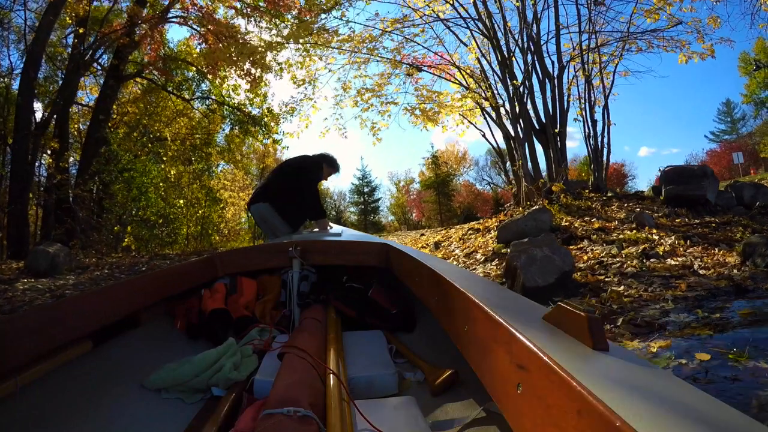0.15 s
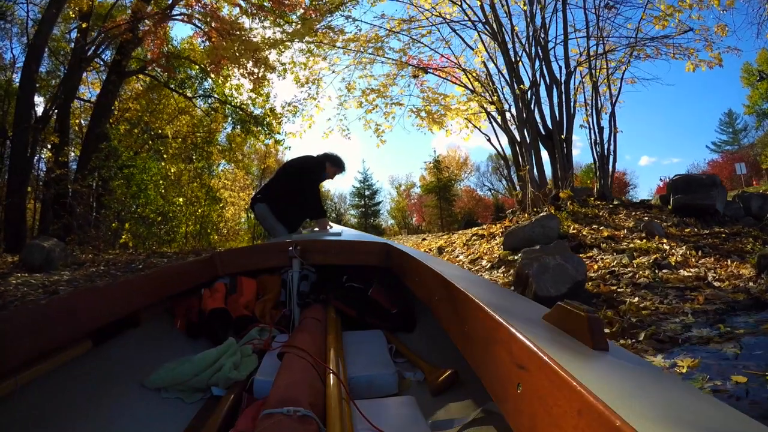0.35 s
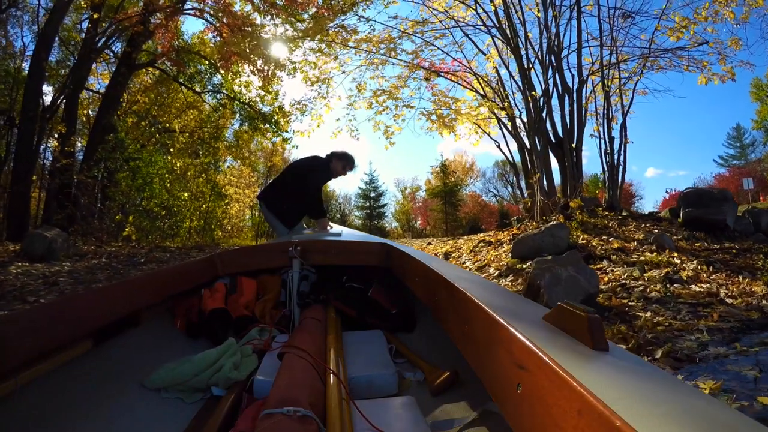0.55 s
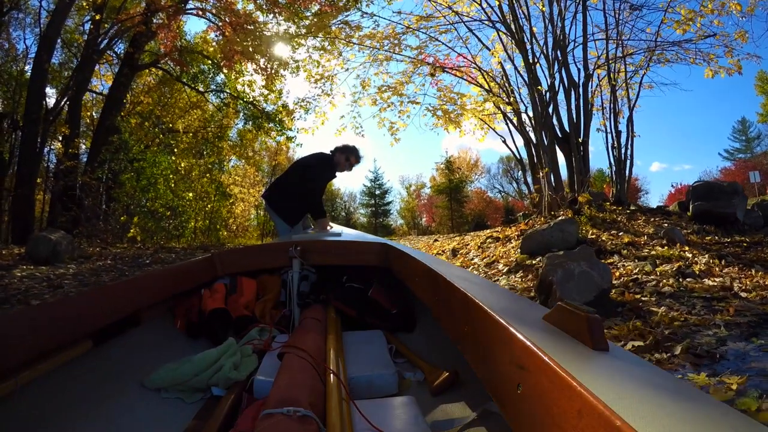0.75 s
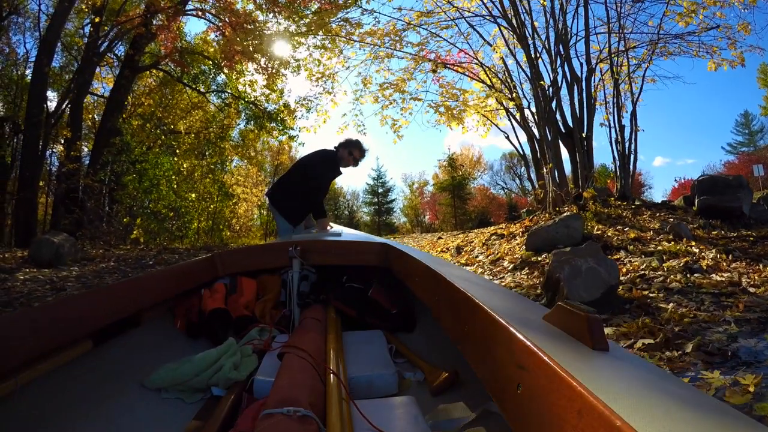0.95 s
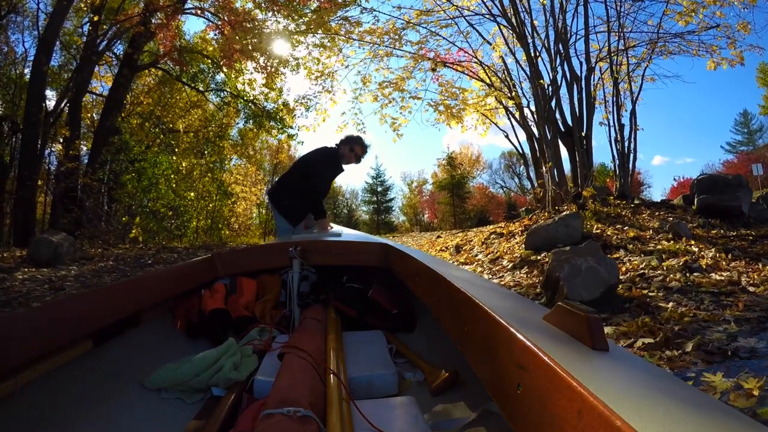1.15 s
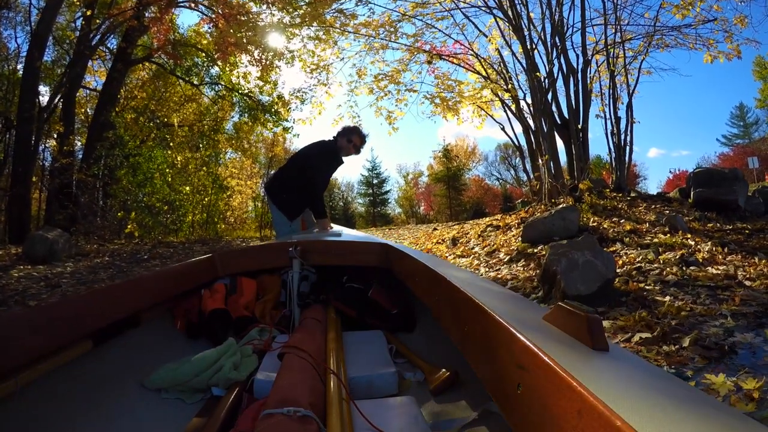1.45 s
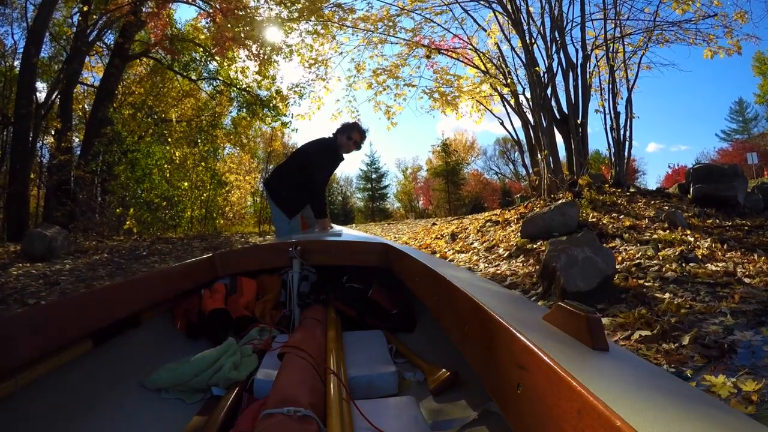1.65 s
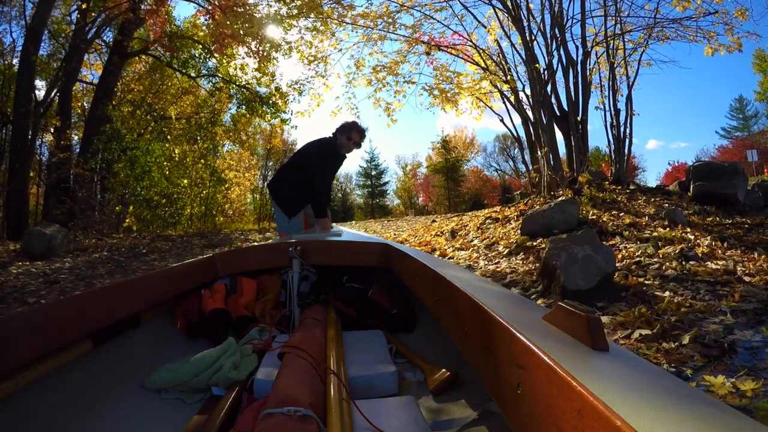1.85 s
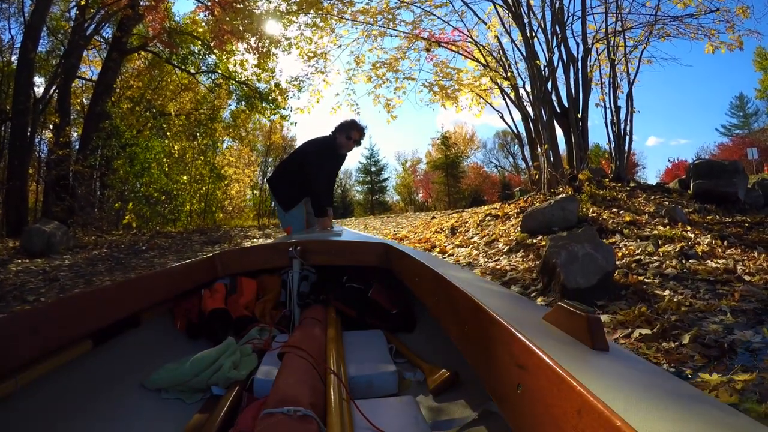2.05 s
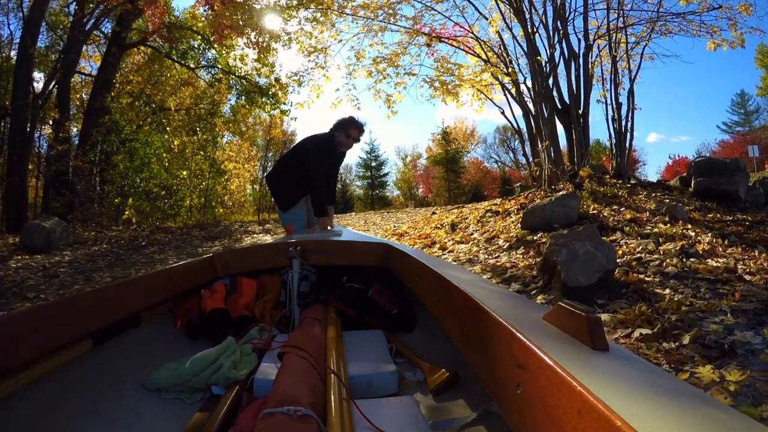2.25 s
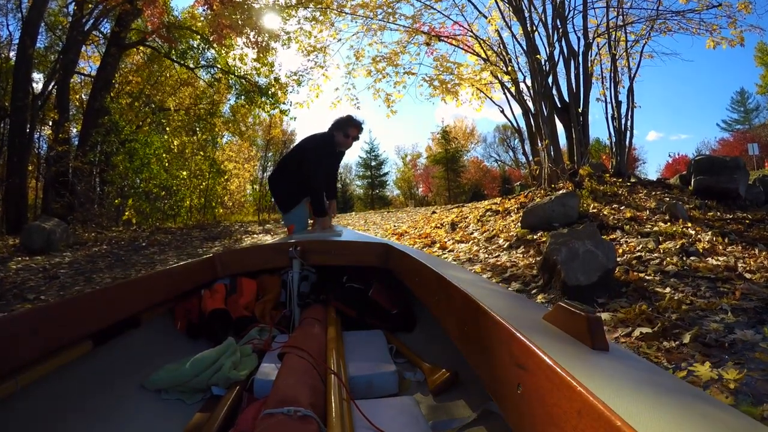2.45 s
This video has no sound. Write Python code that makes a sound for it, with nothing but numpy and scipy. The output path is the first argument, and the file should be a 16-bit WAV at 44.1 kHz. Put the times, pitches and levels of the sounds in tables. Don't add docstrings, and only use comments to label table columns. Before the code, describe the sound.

Close, hull-mounted microphone on a small wooden boat: brief rubbing hiss, loud cracking thump with low boom, scrape over leaves, a tiny squeak, near quiet, then scattered dull knocks, ticks and low bumps outdoors.

```python
import sys
import numpy as np
from scipy import signal
from scipy.io import wavfile
from scipy.ndimage import uniform_filter1d

SR = 44100
rng = np.random.default_rng(int(sys.argv[2]) if len(sys.argv) > 2 else 0)


def dump_mix(stems):
    frames = np.atleast_2d(stems).T
    limited = np.clip(frames, -1, 1)
    pcm = np.round(limited * 32767).astype(np.int16)
    wavfile.write(sys.argv[1], SR, pcm)


def voltage_ratio(decibels):
    exponent = np.asarray(decibels, float) / 20
    return 10 ** exponent


N = 114660
T = np.arange(N) / SR

# pitch_hz, level_db, t60_s
HULL_MODES = [(96.4, -9, 0.43), (134, -23, 1), (144.7, -5.5, 0.14), (194.7, -3, 0.1), (280, -17.5, 0.16),
              (370, -9, 0.064)]
PLANK_HZ = [1036, 1256, 1290, 1506, 1734, 2000, 2474]
PLANK_TRAVEL_MS = 1.475


def unit(x):
    return x / np.sqrt(np.mean(x ** 2))


def band(x, hz, octaves):
    edges = np.clip(hz * 2 ** (np.array([-0.5, 0.5]) * octaves), 10, 0.45 * SR)
    return signal.sosfilt(signal.butter(2, edges, "band", fs=SR, output="sos"), x)


def walk(rate):
    hold = int(SR / rate)
    steps = np.repeat(rng.standard_normal(N // hold + 1), hold)
    return 1.14 * uniform_filter1d(uniform_filter1d(steps, hold), hold)[:N]


def ring(modes, late_ms):
    hz, db, t60 = np.array(modes, float).T[:, :, None]
    arrival_s = late_ms / 1000 * np.sqrt(1000 / hz)
    t = np.maximum(T[:SR // 2] - arrival_s, 0)
    decay = np.exp(-np.log(1000) * t / t60)
    response = (voltage_ratio(db) * np.sin(2 * np.pi * hz * t) * decay).sum(axis=0)
    return unit(response) / np.sqrt(SR // 2)


def grit(spread_db, count=N):
    size = np.minimum(rng.exponential(size=count), 5)
    return unit(rng.standard_normal(count) * voltage_ratio(spread_db * size))


def contacts(rows, rise_ms, fall):
    length = 8192
    out, t_ms = np.zeros(N + length), T[:length] * 1000
    for start_s, db, hz, ms, octaves in rows:
        envelope = np.clip(t_ms / rise_ms, 0, 1) * np.exp(-(t_ms / ms) ** fall)
        burst = band(grit(1.52, count=length) * envelope, hz, octaves)
        first = int(start_s * SR)
        out[first:first + length] += voltage_ratio(db) * burst / np.abs(burst).max()
    return out[:N]


def planking(x):
    chance = rng.standard_normal((67, 2))
    dense_hz = np.geomspace(300, 9000, num=60) * (1 + 0.008 * chance[7:, 0])
    hz = np.r_[dense_hz, PLANK_HZ]
    lift_db = np.r_[np.full(60, 13.5), np.zeros(7)]
    db = chance[:, 1] + 0.34 * np.log2(hz / 1000) + lift_db
    t60 = 0.016 * (1000 / hz) ** 0.5
    modes = np.c_[hz, db, t60]
    response = ring(modes[::2], PLANK_TRAVEL_MS) - ring(modes[1::2], PLANK_TRAVEL_MS)
    return signal.fftconvolve(x, response)[:N] / np.sqrt(2)


def air():
    # pitch_hz, level_db per half octave
    spectrum = [(25, -52.5), (45, -58.5), (90, -52.5), (250, -69), (800, -60.5), (1800, -63.5), (3500, -55),
                (7000, -63.5), (15000, -79)]
    # start_s, level_db
    rustle_rows = [
        (0, -66),
        (.2, -55),
        (.85, -55.5),
        (1.0, -65),
        (1.2, -69),
    ]
    air_hz, air_db = np.array(spectrum).T
    far = 0
    for hz in 25 * 2 ** np.arange(0, 9.6, 0.5):
        flicker_db = min(1, (250 / hz) ** 0.5) * 2 * walk(12)
        level_db = np.interp(np.log(hz), np.log(air_hz), air_db) + flicker_db
        far = far + voltage_ratio(level_db) * unit(band(rng.standard_normal(N), hz, 0.49))
    fine, coarse = grit(1.3), grit(1.3)
    leaves = unit(band(fine, 10970, 0.32)) + voltage_ratio(5.0) * unit(band(coarse, 4540, 3.15))
    rustle_db = np.interp(T, *np.array(rustle_rows).T) + 2.6 * walk(20)
    return unit(far) * voltage_ratio(-46.5) + leaves * voltage_ratio(rustle_db)


def drag():
    # start_s, groan_db, grit_db
    drag_rows = [(0, -47, -46), (.1, -35, -43.5), (.19, -31.5, -42.5), (.26, -21.5, -34), (.36, -28, -40.5),
                 (.55, -35.5, -40.5), (.65, -34.5, -43), (.74, -40, -46), (.82, -26, -42.5),
                 (.92, -41, -50), (1.15, -44, -56.5), (1.3, -51.5, -61), (1.72, -49.5, -57.5),
                 (1.82, -41.5, -54), (2.0, -46.5, -53), (2.25, -56.5, -59.5), (2.402, -36.5, -58),
                 (2.6, -49, -63)]
    start_s, groan_db, grit_db = np.array(drag_rows).T
    damped = [(hz, db / 2, t60 * 0.04) for hz, db, t60 in HULL_MODES]
    slips = grit(3.76) * voltage_ratio(2.2 * walk(29.66))
    groan = unit(signal.fftconvolve(slips, ring(damped, 0.016))[:N])
    rubbing = band(grit(2.0) * voltage_ratio(0.37 * walk(61.8)), 900, 2.98)
    scratch = unit(planking(rubbing))
    groan = band(groan, 174, 3.1) * voltage_ratio(np.interp(T, start_s, groan_db))
    return groan + scratch * voltage_ratio(np.interp(T, start_s, grit_db))


def swish():
    # start_s, level_db, centre_hz
    stroke = [
        (0, -45, 3260),
        (0.029, -39.5, 3400),
        (.08, -35.5, 3700),
        (.12, -30, 4300),
        (.145, -25.5, 5130),
        (.165, -36.5, 5200),
        (.18, -49, 5200),
    ]
    # pitch_hz, width_octaves, lift_db; broad ones, then narrow resonances
    hiss = [(3400, 0.17, -4.0), (2400, 0.98, 1), (4300, 0.36, -4.0), (5200, 0.28, -14.5),
            (6460, 0.6, -6.5), (9200, 0.66, -6), (11500, 0.27, -5),
            (2815, 0.041, -9), (3400, 0.081, -6), (4660, 0.054, -12), (5160, 0.04, -9.5),
            (6340, 0.049, -10), (7400, 0.05, -12)]
    start_s, db, centre_hz = np.array(stroke).T
    out = 0
    for hz, octaves, lift_db in hiss:
        away = np.log2(hz / np.interp(T, start_s, centre_hz))
        level_db = lift_db - 6.8 * away ** 2 + 1.5 * walk(65)
        out = out + unit(band(grit(3.5), hz, octaves)) * voltage_ratio(level_db)
    return out * voltage_ratio(np.interp(T, start_s, db, right=-120) - 8)


def gear():
    # start_s, level_db, pitch_hz, length_ms, width_octaves
    tick_rows = [(.211, -27, 11600, 4.5, 0.25), (.229, -29, 6200, 17.4, 0.46),
                 (.775, -33, 7000, 15.5, 0.49), (1.035, -46, 8950, 19, 0.95), (1.067, -40, 5060, 17, 0.34),
                 (1.08, -45, 11700, 6, 0.21), (1.776, -37, 3800, 9.8, 1), (1.861, -41, 9800, 9.3, 0.89),
                 (1.871, -30, 3520, 9.8, 0.16), (1.911, -31.5, 5200, 16, 0.88),
                 (1.912, -36.5, 10400, 8, 0.86), (2.028, -43, 11500, 5, .7), (2.428, -30, 3500, 12, 0.18)]
    # start_s, level_db, pitch_hz, length_ms, width_octaves
    tap_rows = [(.02, -36, 1800, 6.9, 0.26), (.03, -31, 1650, 7, 0.41), (.213, -23, 1170, 4.3, 0.29),
                (.214, -14.5, 386, 24, 0.55), (.229, -15, 1270, 1.5, 0.44), (.248, -13.5, 1250, 4, 0.55),
                (.258, -32, 1130, 13, 0.54), (.401, -30, 3300, 10, 0.27), (.673, -34.5, 2550, 13, 0.14),
                (.78, -36, 960, 4.4, 0.65), (.484, -35, 2200, 17, 0.33), (.52, -36.5, 3770, 22, 0.11),
                (.535, -39, 2260, 51, 0.11), (.585, -36, 2400, 38, 0.15), (.638, -38.5, 1020, 21, 0.11),
                (.692, -32, 1270, 12, .2), (.774, -36, 2430, 10, 0.18), (.797, -30.5, 1560, 18, 0.12),
                (1.04, -43.5, 850, 8.7, .5), (1.094, -35.5, 595, 8.8, 0.49), (1.107, -38.5, 1330, 17, 0.25),
                (1.112, -42, 610, 8, 0.37), (1.176, -51, 930, 10, 0.33), (2.262, -40, 720, 34, .9),
                (2.422, -33, 1260, 16, 0.74), (2.468, -37, 520, 13, 0.28), (1.605, -28.5, 480, 17.5, 0.59),
                (1.684, -42, 540, 22, 0.65), (1.753, -31.5, 402, 25, 0.26), (2.113, -39.5, 347, 23, 0.46),
                (2.424, -25.5, 375, 13, 0.27), (2.442, -25, 273, 39, 0.62)]
    return contacts(tick_rows, 1.0, 1.2) + contacts(tap_rows, 0.73, 1.0)


def knocks():
    # start_s, level_db, contact_hz, contact_ms, body_db
    knock_rows = [(0.21, -5, 1840, 8.2, -6.5), (.214, -14, 3100, 10.5, -3.5), (0.227, -15, 1180, 6.3, -3.5),
                  (.247, -14, 1150, 14, -8), (0.403, -22.5, 1410, 12, -7.5), (.675, -25.5, 1420, 16, -5.5),
                  (0.78, -27.5, 1290, 9.7, -3.5), (0.804, -26.5, 1510, 12.3, -1.5),
                  (1.748, -29.5, 1060, 35, -5.5), (1.767, -27.5, 1160, 14.7, -4),
                  (1.872, -25, 860, 15, -3.5), (1.937, -29.5, 620, 21, -1.5), (2.011, -40.5, 1310, 6.6, -8),
                  (2.332, -28.5, 1690, 14.7, 0), (2.398, -39.5, 1650, 28, -8), (2.447, -37.5, 1050, 16, -1)]
    # pitch_hz, level_db
    hollow_modes = [(200, 7), (262, 2), (345, 2.5), (415, 3), (540, -6.5), (650, -5), (790, -4)]
    bright_rows = [(s, db, hz, ms, 1.25) for s, db, hz, ms, _ in knock_rows]
    dull_rows = [(s, db + body_db, 439, ms * 1.42, 1.47) for s, db, _, ms, body_db in knock_rows]
    bright = contacts(bright_rows, 1.0, 1.43)
    dull = contacts(dull_rows, 1.2, 0.81)
    plank_ring = ring([(hz, 0, 0.06) for hz in PLANK_HZ], 4.015)
    hollow_ring = ring([(hz, db, 0.03) for hz, db in hollow_modes], PLANK_TRAVEL_MS)
    planks = signal.fftconvolve(bright, plank_ring)[:N]
    hollow = signal.fftconvolve(dull, hollow_ring)[:N]
    return voltage_ratio(1.0) * bright + voltage_ratio(-18) * planks + voltage_ratio(-6.5) * hollow + voltage_ratio(-3.0) * dull


def keel_drop():
    # pitch_hz, level_db, t60_s
    drop_modes = [(101.5, 3, 0.13), (95, -9, 0.43), (83.3, -29, 0.59), (148, -14.5, .1), (193.5, -13, 0.24),
                  (271, -21, 0.35)]
    rise_ms = 5.9
    t = np.maximum(T - 0.2235, 0)
    boom = sum(voltage_ratio(db) * np.sin(2 * np.pi * hz * t) * voltage_ratio(-60 * t / t60) for hz, db, t60 in drop_modes)
    return boom * (1 - np.exp(-t * 1000 / rise_ms))


def shoves():
    # start_s, level_db, push_ms, ring_db, direction
    shove_rows = [(0.2327, -10, 4, -9, 1), (.2385, -19.5, 3.8, -18, 1), (0.415, -23, 4.7, 1.5, 1),
                  (.79, -27, 5, 2, -1), (.815, -26, 4.9, 5, -1), (.953, -24.5, 3.8, 0, -1),
                  (1.0517, -28, 5.5, -9, -1), (1.099, -27.5, 4.9, -1, -1), (1.113, -31.5, 7.2, -2, 1),
                  (1.13, -32.5, 3.5, -9, -1), (1.968, -33.5, 9.7, -3, 1), (2.026, -43, 5.8, -3, 1),
                  (2.031, -39, 8.5, -9, -1), (2.297, -25, 24, -8, 1), (2.324, -25, 8.6, -14, -1),
                  (2.338, -20.5, 5.6, -1, 1), (2.3415, -20, 4.6, -21, -1), (2.344, -10.5, 6.7, -20, 1),
                  (2.372, -23, 5.9, -1, -1), (2.377, -28, 8.2, -13, 1), (2.407, -29, 7.6, -9, 1),
                  (2.451, -17.5, 3.8, -19, 1), (2.4604, -21, 3.5, -12, 1), (2.4904, -21.5, 4.8, -18, 1),
                  (2.499, -24.5, 5.6, -3, 1), (2.529, -29, 5, -17, 1)]
    direct, ringing = np.zeros(N), np.zeros(N)
    for start_s, db, ms, ring_db, way in shove_rows:
        progress = np.clip((T - start_s) * 1000 / ms, 0, 1)
        push = np.sign(way) * voltage_ratio(db) * np.sin(np.pi * progress) ** 2
        direct = direct + band(push, 480 / ms, 3.2)
        ringing = ringing + voltage_ratio(ring_db) * push
    return direct + voltage_ratio(-18) * signal.fftconvolve(ringing, ring(HULL_MODES, 0.0045))[:N]


def squeak():
    # start_s, pitch_hz, level_db
    glide = [
        (0.887, 4480, -53),
        (0.9, 3900, -51),
        (0.91, 3790, -42),
        (0.92, 3770, -42.5),
        (0.927, 3455, -43.5),
        (0.934, 3400, -45.5),
        (.951, 3385, -44.5),
        (0.964, 3630, -49),
        (0.98, 3620, -56),
    ]
    start_s, hz, db = np.array(glide).T
    pitch_hz = np.interp(T, start_s, hz) * (1 + 0.03 * walk(1100))
    phase = 2 * np.pi * np.cumsum(pitch_hz) / SR
    tone = np.sin(phase) + voltage_ratio(-14) * np.sin(2 * phase) + voltage_ratio(-9) * np.sin(3 * phase)
    level_db = np.interp(T, start_s, db, left=-120, right=-120) + 3.5 * walk(350)
    return np.sqrt(2) * tone * voltage_ratio(level_db)


def scene():
    friction = drag() + swish() + squeak()
    impacts = gear() + knocks() + keel_drop() + shoves()
    return (air() + friction + impacts)[None]


def low_pass(x):
    return signal.sosfilt(signal.butter(12, 16120, fs=SR, output="sos"), x)


def record(dry):
    rounded = np.tanh(dry / 2) * 2
    top_cut = signal.ellip(8, 0.2, 70, 15550, fs=SR, output="sos")
    mix = signal.sosfilt(top_cut, rounded)
    return low_pass(mix)


dry = scene()
out = record(dry)
dump_mix(out)
```